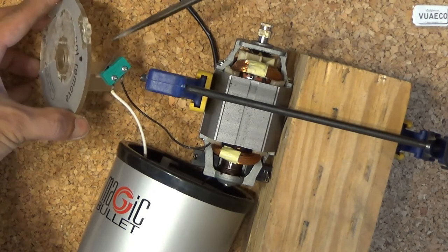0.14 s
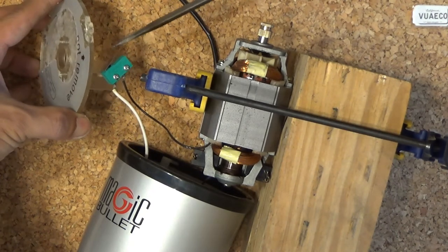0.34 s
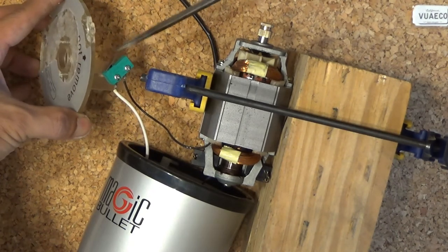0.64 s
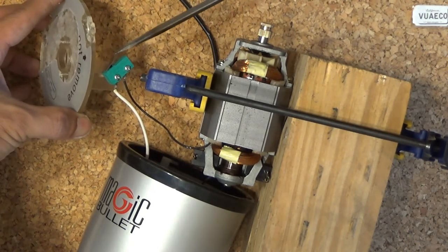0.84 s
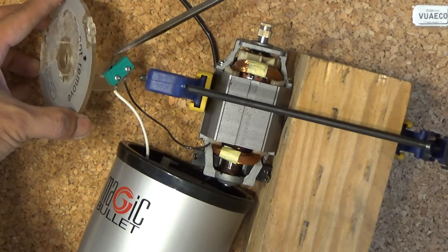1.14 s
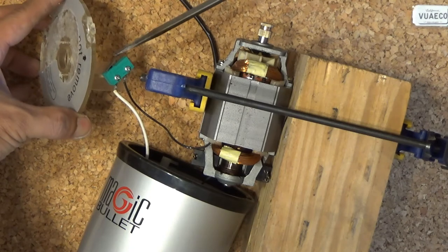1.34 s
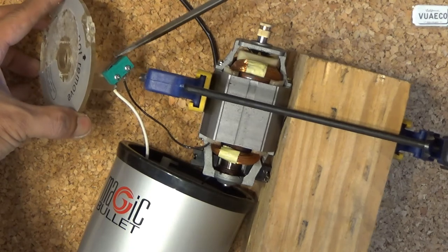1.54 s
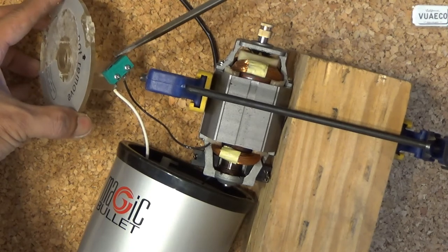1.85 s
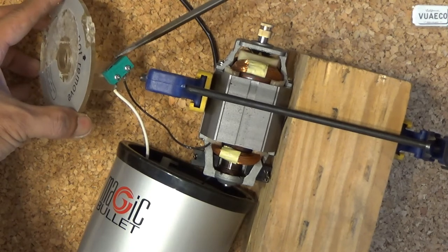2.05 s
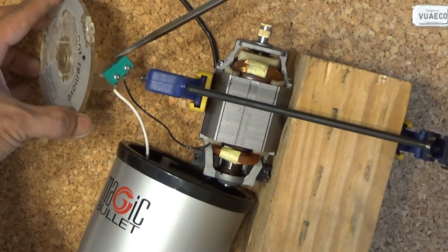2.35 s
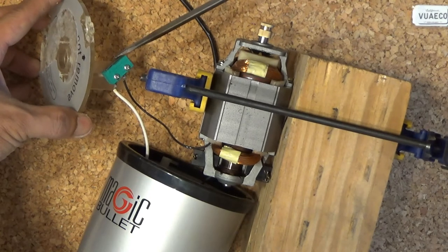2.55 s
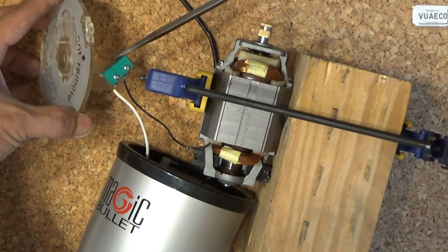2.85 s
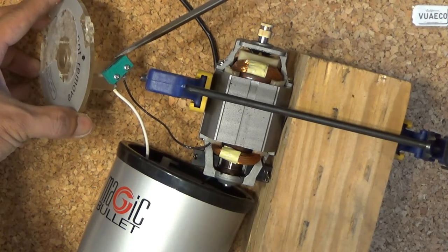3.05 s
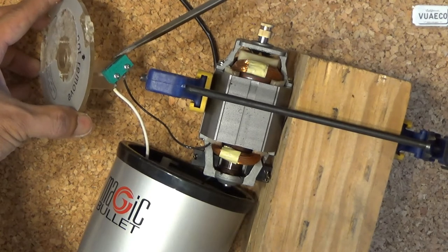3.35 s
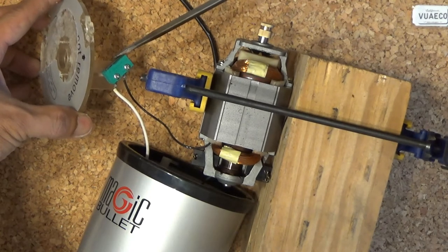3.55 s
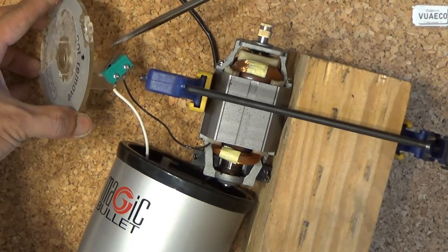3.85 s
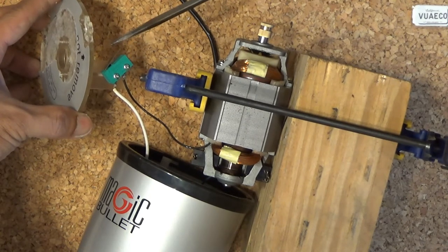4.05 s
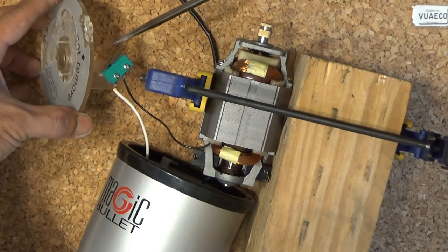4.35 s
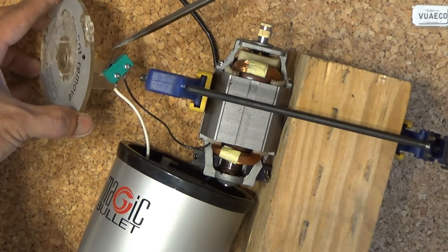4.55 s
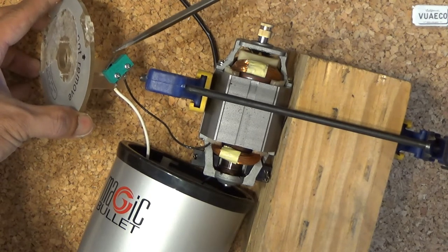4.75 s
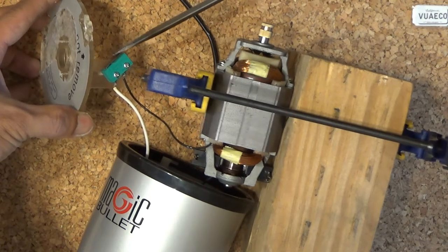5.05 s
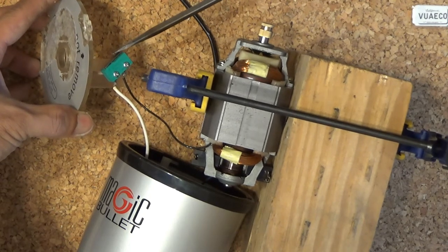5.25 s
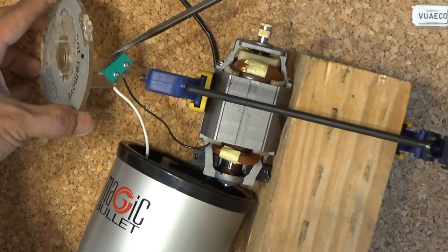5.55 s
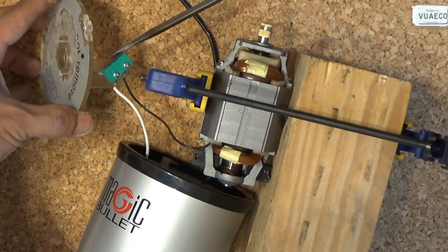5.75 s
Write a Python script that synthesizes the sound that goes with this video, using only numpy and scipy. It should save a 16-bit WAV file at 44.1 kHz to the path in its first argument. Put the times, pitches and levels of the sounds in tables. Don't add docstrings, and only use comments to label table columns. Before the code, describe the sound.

In a quiet room with faint insects, a raspy brushed motor jumps to a shrill whine, winds down ticking, and restarts.

```python
import sys
import numpy as np
from scipy import signal
from scipy.fft import rfft, irfft, next_fast_len
from scipy.io import wavfile
from scipy.ndimage import uniform_filter1d

SR = 44100
rng = np.random.default_rng(int(sys.argv[2]) if len(sys.argv) > 2 else 0)


def transcribe(signal):
    frames = np.atleast_2d(signal).T
    limited = np.clip(frames, -1, 1)
    pcm = np.round(limited * 32767).astype(np.int16)
    wavfile.write(sys.argv[1], SR, pcm)


def gain_from_db(level_db):
    decades = np.asarray(level_db, float) / 20
    return 10 ** decades


N = 260190
M = next_fast_len(N + SR // 2)
T = np.arange(N) / SR
F = np.arange(M // 2 + 1) * SR / M


def level(x, db):
    return x * gain_from_db(db) / np.sqrt(np.mean(x ** 2))


def apply(x, gain):
    return irfft(rfft(x, M) * gain, M)[:N]


def shape(points):
    hz, db = np.transpose(points)
    return gain_from_db(np.interp(np.log(F + 1), np.log(hz), db))


def noise(points):
    return level(apply(rng.standard_normal(N), shape(points)), 0)


def ring(x, modes, cut_hz, flip=-1):
    gain = 0
    for k, (hz, width, db) in enumerate(modes):
        gain = gain + flip ** k * gain_from_db(db) / (1 + 2j * (F - hz) / width)
    edge = signal.freqs(*signal.cheby1(6, 1, 1, "high", analog=True), F / cut_hz)[1]
    return apply(x, gain * edge)


def walk(rate):
    k = int(SR / rate)
    steps = np.repeat(rng.standard_normal(N // k + 1), k)
    return 0.52 * uniform_filter1d(uniform_filter1d(steps, k), k)[:N]


def gate(spans):
    inside = sum((T > a) & (T < b) for a, b in spans)
    return uniform_filter1d(inside * 1., 160)


def tone(turn, multiple, wobble_db=2.5):
    wave = np.sin(2 * np.pi * (multiple * turn + rng.random()))
    return np.sqrt(2) * gain_from_db(wobble_db * walk(25.04)) * wave


def tones(turn, table, wobble_db=2.5):
    return sum(gain_from_db(db) * tone(turn, k, wobble_db) for k, db in table)


# [Hz, dB per Hz]
RUMBLE = [(12, -41), (20, -11), (75, 1.5), (323, -10.5), (393, -4), (651, -10), (793, -9), (993, -11),
          (3820, -24), (7710, -18), (9130, -23.5), (15100, -26.5), (16500, -58)]
# [s, s, dB]
INSECT_SWELLS = [
    (.07, .12, -71),
    (.47, 0.17, -66),
    (.82, 0.19, -62.5),
    (1.1, .1, -71),
    (1.297, 0.11, -64),
    (4.997, .11, -66),
]


def room():
    swell = gain_from_db(-85)
    for s, length, db in INSECT_SWELLS:
        swell = swell + gain_from_db(db) * np.exp(-(2 * (T - s) / length) ** 4)
    song = ring(rng.standard_normal(N), [(6300, 1200, 0.5), (7800, 1100, -4)], cut_hz=7800)
    insects = swell * gain_from_db(2.0 * walk(40)) * level(song, 0)
    middle = noise(RUMBLE) * gain_from_db(1.5 * walk(11))
    sides = gain_from_db(-12) * noise(RUMBLE) * np.array([[1], [-1]])
    return level(middle + sides, -53.5) + insects


def echo(x, t60):
    age = np.arange(SR // 3) / SR
    tail = rng.standard_normal(len(age)) * gain_from_db(-60 * age / t60)
    return apply(x, rfft(tail / np.sqrt(np.sum(tail ** 2)), M))


def burst(start, t60, modes, cut_hz):
    age = np.maximum(T - start, 0)
    blow = (T >= start) * rng.standard_normal(N) * gain_from_db(-60 * age / t60)
    sound = ring(blow, modes, cut_hz)
    return sound / np.abs(sound).max()


# [s, dB]
BENCH_KNOCKS = [
    (1.421, -30.5),
    (2.171, -38),
    (5.068, -27),
    (5.699, -43),
]


def knocks():
    bench = [(91, 69, -4), (214, 470, -12.5)]  # f/Hz, width/Hz, level/dB
    return sum(gain_from_db(db) * burst(s, 0.23, bench, cut_hz=80) for s, db in BENCH_KNOCKS)


# [s, dB, s]
CLICKS = [
    (0.8016, -29, 0.022),
    (1.4117, -7, 0.022),
    (1.4164, -9, 0.022),
    (4.8199, -16, 0.022),
    (4.8733, -31, 0.022),
    (5.0624, -7, 0.022),
]
# [Hz, Hz, dB]
SWITCH = [(3900, 400, -11), (7500, 2000, -7), (11300, 900, 0), (14000, 1500, -2)]


def clicks():
    return sum(gain_from_db(db - 4.0) * burst(s, t60, SWITCH, cut_hz=1400) for s, db, t60 in CLICKS)


# [s, s]
POWER_ON = [
    (1.413, 3.644),
    (5.064, 6.0),
]
# [Hz, s]
SPEED_GAIN = [
    [(117, .0456), (132.9, .2586), (178.6, 5.38)],
    [(80.8, .033), (108.9, .121), (159.3, .616)],
]


def shaft():
    start_hz, rest_hz = 41, 5
    lag_s, friction_hz_per_s, drag_s = .002, 300.8, 8.0
    speed, since = np.full(N, 1. * start_hz), np.zeros(N)
    for (on, off), stages in zip(POWER_ON, SPEED_GAIN):
        age = T - on - lag_s
        powered = np.clip(age, 0, off - on - lag_s)
        up = start_hz + sum(hz * (1 - np.exp(-powered / tau)) for hz, tau in stages)
        loss = friction_hz_per_s * drag_s * (1 - np.exp(-np.maximum(T - off, 0) / drag_s))
        speed = np.where(age > 0, np.maximum(up - loss, rest_hz), speed)
        since = np.where(age > 0, age, since)
    return speed, since


# [Hz, dB per Hz]
FAN_AIR = [(40, -33), (110, -20), (200, -18.5), (400, -9), (700, -7), (1050, -9.5), (1600, -13), (2300, 0),
           (3300, -8.5), (4300, -7), (6500, -8), (9000, -37)]


def fan(speed):
    return gain_from_db(-29 + 2.0 * walk(12)) * (speed / 330) ** 1.29 * noise(FAN_AIR)


# [1, dB]
UNBALANCE = [(2, -37.5), (3, -40.5), (8, -26), (12, -38.5), (16, -33)]
# [1, dB]
SINGING = [(16, -20), (18, -46), (24, -54), (26, -30.5), (30.56, -22), (32.58, -33), (33.55, -36.5),
           (34, -29.5)]
# [1, dB]
COGGING = [(10, -43), (20, -41.5), (30, -48.5), (40, -52)]
# [Hz, Hz, dB]
FRAME_MODES = [(710, 70, -2), (960, 120, -7), (1400, 350, -4), (2250, 300, -4), (2620, 300, 0),
               (3250, 400, -5), (4300, 350, -4)]
# [Hz, Hz, dB]
HOLDER_MODES = [(5420, 350, -12), (5830, 250, -9), (6500, 300, 1), (7150, 300, -3), (7900, 500, -5),
                (8950, 300, -4), (9750, 400, -8), (10350, 500, -4), (11500, 600, 0), (12300, 400, -8),
                (13200, 450, 1), (14300, 500, -4), (15300, 1000, -9)]
# [Hz, Hz, dB]
BLOCK_MODES = [(110, 28, -4), (346.7, 29.5, -1.5)]


def rotor(speed, turn):
    pace = speed / 330
    low = tones(turn, UNBALANCE) * pace ** 1.4 * np.clip(speed / 210, 0, 1) ** 3
    high = tones(turn, SINGING) * pace ** 9.3
    once_a_turn = gain_from_db(-33) * tone(turn, 1) * pace ** 2
    cog = tones(turn, COGGING, wobble_db=4.0)
    body = ring(low + cog, FRAME_MODES, cut_hz=643)
    return body + ring(high, HOLDER_MODES, cut_hz=5570) + ring(once_a_turn, BLOCK_MODES, cut_hz=71)


# [1, dB]
SLOT_PULL = [(10, -29.5), (20, -32.5), (30, -31), (40, -39)]
# [Hz, Hz, dB]
CORE_MODES = [(770, 140, -3), (1350, 250, -9), (2350, 200, -5), (3200, 280, 0), (4450, 300, -9),
              (5550, 400, -5)]


def field(speed, turn, on):
    mains_hz, throb = 60, 1.7
    current = on * (390 / (speed + 60)) ** 1.49 * np.clip(speed / 140, 0, 1) ** 2
    beat = np.cos(2 * np.pi * (2 * mains_hz * T + 0.37))
    buzz = gain_from_db(-40) * rng.standard_normal(N)
    pull = current * (1 + throb * beat) * (tones(turn, SLOT_PULL) + buzz)
    hum = gain_from_db(-50 + 2.0 * walk(30)) * current * beat
    lopsided = current ** 2 * (gain_from_db(-39) * tone(turn, 3) + gain_from_db(-36) * tone(turn, 5))
    core = ring(pull + (1 + 0.86 * beat) * lopsided, CORE_MODES, cut_hz=702, flip=1)
    return core + ring(hum, BLOCK_MODES, cut_hz=52)


# [1, dB]
GROOVES = [(17, -9), (19, -14), (21, -22.5), (22, -16.5), (27, -15.5), (29, -15), (36, -12.5), (37, -23),
           (39, -24), (41, -9), (42, -16)]


def scoring(turn):
    return ring(tones(turn, GROOVES, wobble_db=5.5), HOLDER_MODES, cut_hz=5020)


# [Hz, dB]
CARBON_HISS = [(3500, -40), (4850, -28), (5250, -9), (6500, -3), (8200, -3), (9800, -4), (11500, -3),
               (13200, -4), (14500, -8), (16000, -13)]


def brushes(speed, turn):
    bar = np.arange(int(20 * turn[-1]))
    weak = bar % 2
    height, place = rng.standard_normal((2, 20))[:, bar % 20]
    place = place + .7 * height * np.interp(bar / 20, turn, walk(7))
    slot = bar // 2 + .47 * weak + .019 * place
    at = np.interp(slot / 10, turn, np.arange(N))
    size = gain_from_db(-9 * weak + 2.5 * height + 2.5 * rng.standard_normal(len(bar)))

    taps = np.floor(at)[:, None] + np.arange(-7, 9) - at[:, None]
    spots = (taps + at[:, None]).round().astype(int)
    pulses = size[:, None] * np.sinc(taps) * np.cos(taps * np.pi / 17)
    ticks = np.zeros(N + 20)
    np.add.at(ticks, spots, pulses)

    hiss, air = rng.standard_normal((2, N))
    depth = .17 + .3 * np.exp(-speed / 90)
    swell = 1 + depth * np.sin(2 * np.pi * turn)
    contact = (ticks[:N] * np.sqrt(SR / 10 / speed) + gain_from_db(-9) * hiss) * swell
    holders = ring(contact, HOLDER_MODES, cut_hz=5080)
    open_air = gain_from_db(-10) * apply(air * swell, shape(CARBON_HISS))
    scrape = (hiss + gain_from_db(2) * contact) * swell * (1 + 3 * np.exp(-speed / 25))
    rub = holders + open_air + gain_from_db(-32) * ring(scrape, FRAME_MODES, cut_hz=600)
    dull = signal.lfilter([.5, .5], [1, -.2], rub)
    return level(dull + np.clip(speed / 300, 0, 1) * (rub - dull), 0)


# [s, s]
SHAFT_MOVES = [
    (1.414, 4.89),
    (5.065, 6.0),
]
# [Hz, dB]
BRUSH_LEVEL = [(5, -41), (20, -35.5), (40, -25), (75, -19), (140, -15.5), (240, -14.5), (300, -17),
               (350, -19)]


def motor():
    speed, since = shaft()
    turn = np.cumsum(speed) / SR
    seating_db = -3.5 * np.exp(-since / 0.04)
    brush_db = np.interp(speed, *np.transpose(BRUSH_LEVEL)) + seating_db + 2 * walk(8)
    rubbing = gain_from_db(brush_db) * (brushes(speed, turn) + scoring(turn))
    spin = rubbing + rotor(speed, turn) + fan(speed)
    return gate(SHAFT_MOVES) * spin + field(speed, turn, gate(POWER_ON))


# [Hz, side minus middle dB]
WIDTH = [(60, -31), (110, -30), (200, -12), (380, -30), (700, -25.5), (1290, -32), (2380, -30), (4400, -30),
         (8120, -26.5), (15000, -30.5)]


def scene():
    dry = motor() + clicks() + knocks()
    near = dry + gain_from_db(-11) * echo(dry, t60=.02) + gain_from_db(-21) * echo(dry, t60=.28)
    side = apply(echo(dry, t60=.05), gain_from_db(6) * shape(WIDTH))
    return near + side * np.array([[1], [-1]]) + room()


def low_pass(x):
    return signal.sosfilt(signal.butter(12, 16620, fs=SR, output="sos"), x)


def record(dry):
    top_cut = signal.ellip(10, .2, 60, 15660, fs=SR, output="sos")
    mix = signal.sosfilt(top_cut, np.tanh(dry))
    return low_pass(mix)


dry = scene()
out = record(dry)
transcribe(out)
```